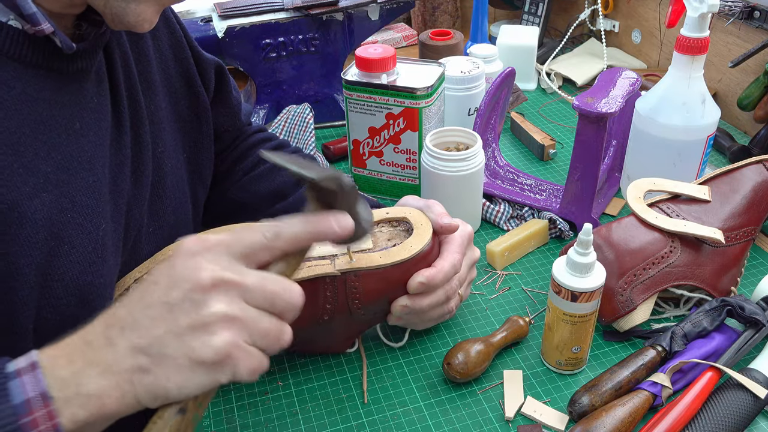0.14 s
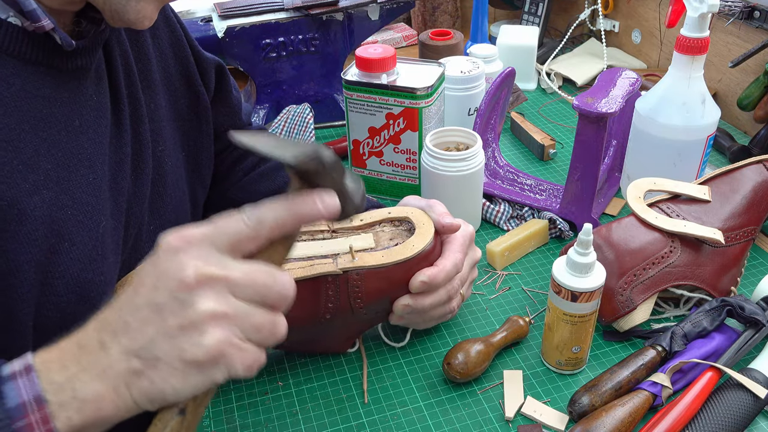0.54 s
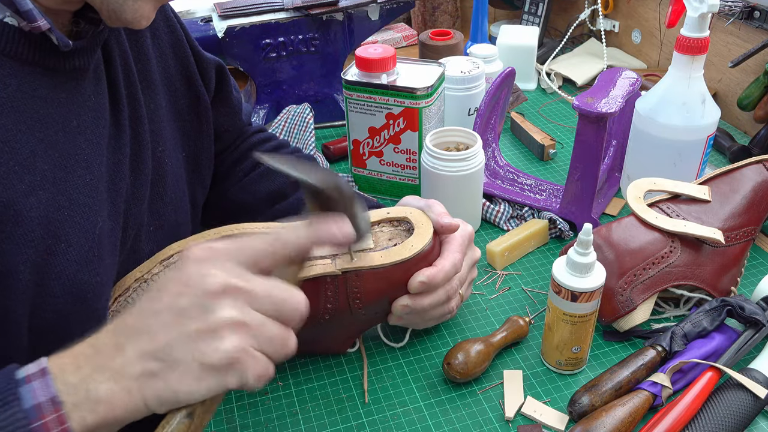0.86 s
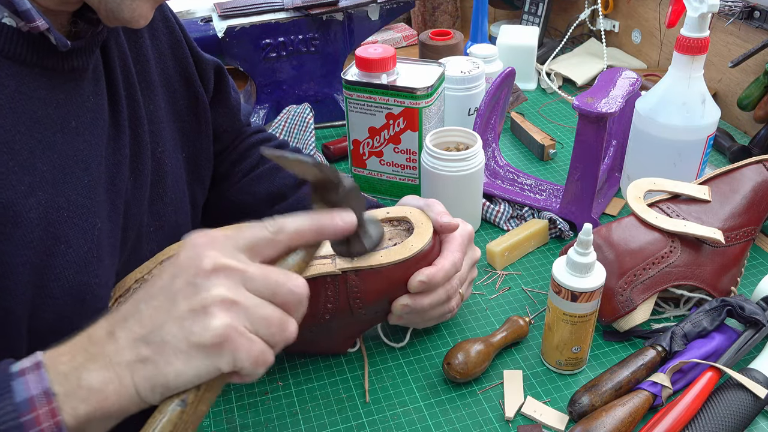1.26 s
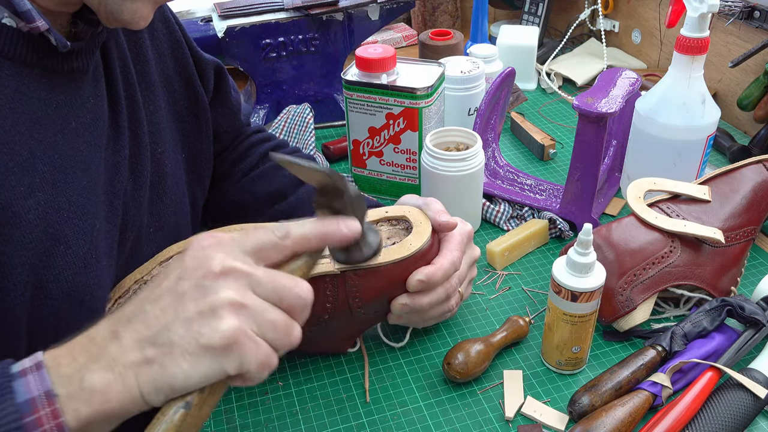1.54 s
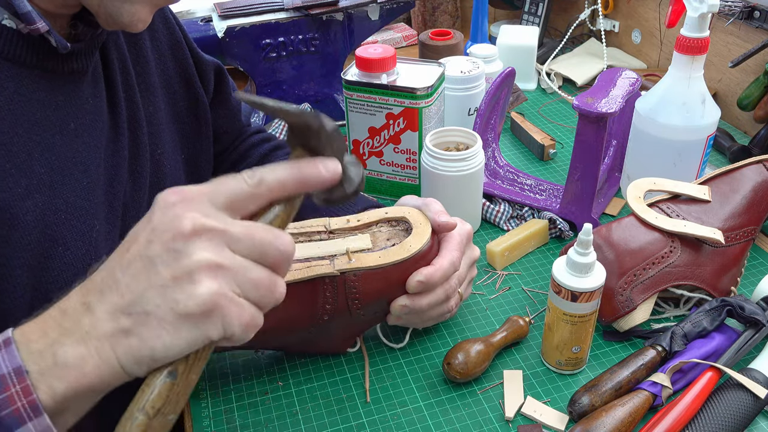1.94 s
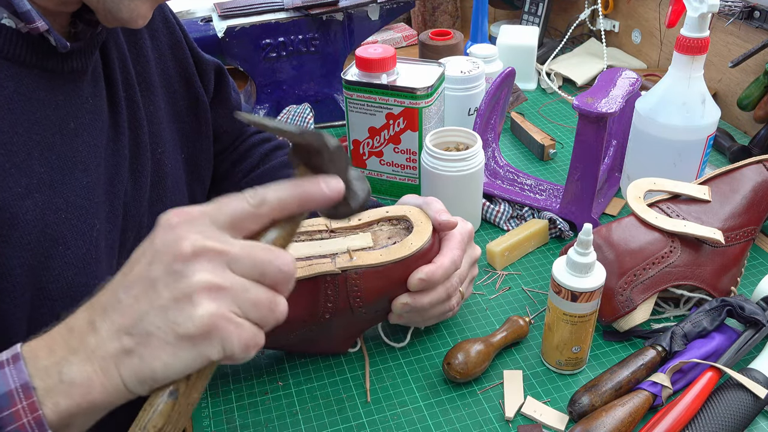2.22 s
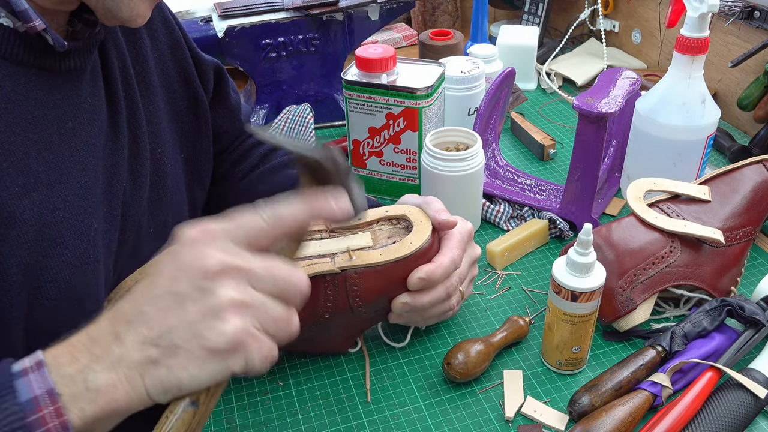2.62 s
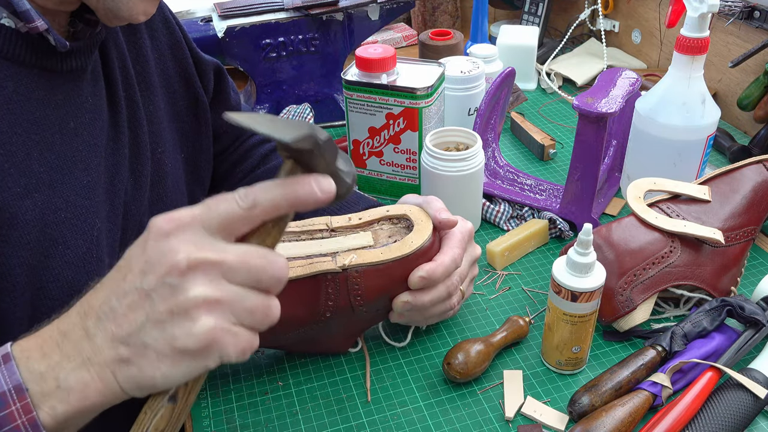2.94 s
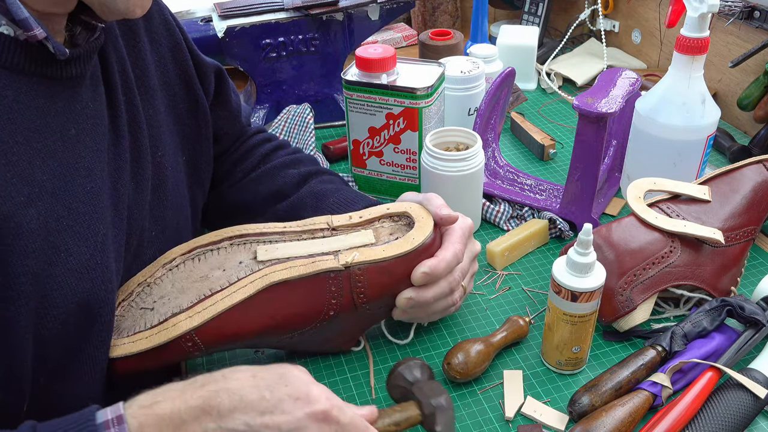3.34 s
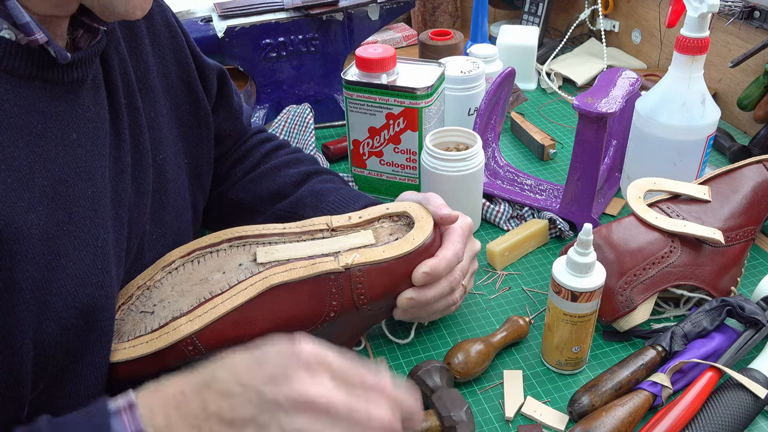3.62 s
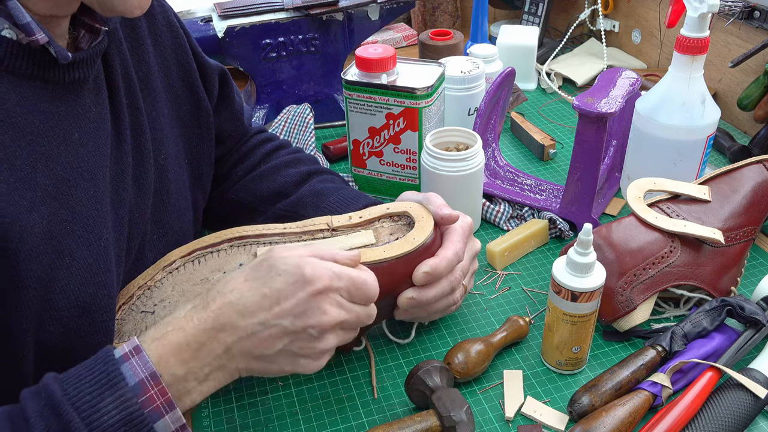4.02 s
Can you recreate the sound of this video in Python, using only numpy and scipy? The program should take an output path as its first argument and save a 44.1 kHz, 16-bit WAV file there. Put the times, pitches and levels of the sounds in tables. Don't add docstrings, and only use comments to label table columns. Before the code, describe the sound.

Ten even, blunt hammer blows on leather and wood, loud enough to distort a close microphone, each with a sharp click, dull knock, faint steel ring and bench boom. The room is small and dry. After the last blow come light ticks and cloth movement, then softer hollow wooden thuds and a clatter as the hammer is set down and rocks to rest. Faint finger rubbing closes over low room rumble.

```python
import sys
import numpy as np
from scipy import signal
from scipy.fft import rfft, irfft
from scipy.io import wavfile
from scipy.ndimage import uniform_filter1d

SR = 44100
rng = np.random.default_rng(int(sys.argv[2]) if len(sys.argv) > 2 else 0)


def gain_from_db(level_db):
    decades = np.asarray(level_db, float) / 20
    return 10 ** decades


def transcribe(signal):
    frames = np.atleast_2d(signal).T
    limited = np.clip(frames, -1, 1)
    pcm = np.round(limited * 32767).astype(np.int16)
    wavfile.write(sys.argv[1], SR, pcm)


N = 183730
LEAD = SR // 4

# f/Hz, level/dB
KNOCK_REFLECTIONS = [(100, 2.5), (350, -6), (700, 0.5), (1500, -1), (4000, -2), (8000, -8.5), (15000, 9.5)]
# f/Hz, level/dB, t60/s
TOOLS = [(1421, -33, .06), (2837, -24, .045), (4100, -31, .05), (5146, -41, .07), (6907, -45, .12),
         (7908, -45, .06), (8818, -42, .12), (10040, -40, .09)]
# f/Hz, level/dB, t60/s
HANDLE = [(445, -21, 0.063), (501, -22.5, 0.11), (606, -16, 0.045), (790, -16.5, 0.025),
          (954, -15.5, 0.026), (1433, -17.5, 0.023)]
# f/Hz, level/dB, t60/s
AWL = [(3360, 0, .13)]
# f/Hz, level/dB, t60/s
CLAW = [(8100, 0, .09)]
# f/Hz, level/dB, t60/s
POLL = [(6907, 0, .3)]


def read(points, hz):
    f, value = np.transpose(points)
    return np.interp(np.log(hz + 1), np.log(f + 1), value)


def evened(x):
    return x / np.sqrt(np.mean(x ** 2) + 1e-20)


def add(mix, s, sound):
    part = mix[LEAD + round(s * SR):][:len(sound)]
    part += sound[:len(part)]


def ring(modes, seconds, rise_s=.0001):
    t = np.arange(round(seconds * SR)) / SR
    hz, db, t60 = np.transpose(modes)[:, :, None]
    decaying = gain_from_db(db - 60 * t / t60) * np.sin(2 * np.pi * hz * t)
    return decaying.sum(0) * (1 - np.exp(-t / rise_s))


def shifted(modes, spread, spread_db):
    spot = rng.standard_normal((len(modes), 2))
    return [(hz * (1 + spread * a), db + spread_db * b, t60)
            for (hz, db, t60), (a, b) in zip(modes, spot)]


def coloured(points, size):
    hz = np.fft.rfftfreq(size, 1 / SR)
    spectrum = rfft(rng.standard_normal(size)) * gain_from_db(read(points, hz))
    return evened(irfft(spectrum, size))


def room_tail(tone, gap_s=0.00033, build_s=0.0099):
    # f/Hz, t60/s
    decay_times = [(100, 0.32), (400, 0.19), (1100, 0.16), (3000, 0.1623), (8000, .17), (15000, 0.11)]
    size = SR // 2
    hz, t, z = signal.stft(coloured(tone, size), SR, nperseg=256)
    decay = gain_from_db(-60 * t / read(decay_times, hz)[:, None])
    tail = signal.istft(z * decay, SR, nperseg=256)[1][:size]
    t = np.arange(size) / SR
    tail = tail * (1 - np.exp(-np.maximum(t - gap_s, 0) / build_s))
    tail = tail * gain_from_db(2.5 * evened(uniform_filter1d(rng.standard_normal(size), size=90)))
    return tail / np.linalg.norm(tail)


def air():
    # f/Hz, level/dB
    air_spectrum = [(12, -21.5), (28, 0), (45, 3), (80, -15), (160, -18.5), (400, -29), (1000, -34.5),
                    (2800, -42), (3900, -40), (5500, -47), (15000, -50), (16500, -56)]
    return gain_from_db(-53.5) * coloured(air_spectrum, N)


def swish():
    swing = np.arange(round(0.045 * SR)) / (0.055 * SR)
    return gain_from_db(-75.5) * swing * coloured([(200, -10.0), (800, -3.5), (2500, 9), (5000, -17)], len(swing))


def blows(tail_db=13, sway_share=0.6):
    # t/s, force level/dB, low head mode level/dB, high head mode level/dB, sharp edge level/dB
    strikes = [(-.19, -20, -76.5, -70, 0), (0.0875, -4, -58, -66.5, 8.5), (0.3658, -5.5, -66, -40, 3.5),
               (0.649, -2.5, -49, -54, 7.5), (0.9286, -3, -61, -57.5, 8.5), (1.2196, -3.5, -68, -50, 8),
               (1.5163, 0, -60.5, -66.5, 5), (1.8092, -1, -49, -72, 3.5), (2.1023, -1.5, -52, -75, 7),
               (2.3966, -2, -52, -64, 6), (2.7023, -1, -45.5, -74.5, -2)]
    # f/Hz, level/dB, t60/s
    face_modes = [(1966, 2, .0065), (3870, -3, .007), (5024, -6, 0.0081)]
    # f/Hz, level/dB, t60/s
    edge_modes = [(8600, -19.5, 0.0036), (13300, -22.5, 0.004)]
    # f/Hz, level/dB, t60/s
    shoe_modes = [(373, -0.5, .028), (528, 7, .011), (1064, 7, 0.0083), (1367, 1, .008)]
    # f/Hz, level/dB, t60/s
    bench_modes = [(91.2, -8.5, .19), (140.3, -8.5, .1), (158.4, -43, 0.8), (151, -47.5, .8),
                   (260.4, -16, .1), (315.6, -10.5, 0.081), (369.6, -9, 0.076), (438.3, -17.5, 0.094),
                   (565, -20, .13), (607, -22, .14), (643, -21, .12), (686, -22, .1), (765, -23, .11),
                  (876, -24, .11), (943, -23, .1), (1036, -24, .1), (1100, -23, .1)]
    # f/Hz, level/dB, t60/s
    leg_modes = [(27.73, -24.5, 0.55), (37.67, -25, 0.99), (46.5, -38.5, 0.35), (64.31, -41.5, 2.6)]
    # f/Hz, t60/s
    head_modes = [(6907, .45), (10790, .15)]
    # f/Hz, level/dB
    blow_reflections = [(130, -27), (240, -1), (340, -3.5), (600, -1), (1000, -2), (1600, -10), (2200, -12),
                        (2900, -16.5), (3900, -13), (5500, -23), (7000, -32), (11000, -34), (15500, -38.5)]
    shoe_lag_s, bench_lag_s, legs_lag_s = .0011, .0048, .003
    same = .7

    out = np.zeros(N + LEAD)
    walls = room_tail(blow_reflections)
    legs = ring(leg_modes, 1.5, rise_s=0.0039)
    for s, force_db, low_db, high_db, edge_db in strikes:
        force = gain_from_db(force_db)
        push_db = 0.75
        if s == strikes[-1][0]:
            push_db -= 7
        add(out, s, -force * ring(shifted(face_modes, .035, 1.6), .02))
        add(out, s, -gain_from_db(edge_db) * ring(shifted(edge_modes, .04, 1.3), .01))
        add(out, s + shoe_lag_s, force * ring(shifted(shoe_modes, .04, 1.8), .05))
        shaken = shifted(bench_modes, .012, 1.1)
        add(out, s + bench_lag_s, gain_from_db(push_db) * ring(shaken, .8, rise_s=.002))
        add(out, s + legs_lag_s, gain_from_db(sway_share * push_db) * legs)
        head = [(hz, db, t60) for (hz, t60), db in zip(head_modes, (low_db, high_db))]
        add(out, s, ring(head, .4))
        reflections = same * walls + np.sqrt(1 - same ** 2) * room_tail(blow_reflections)
        add(out, s, gain_from_db(force_db + tail_db) * reflections)
        if s > 0:
            add(out, s - .05, swish())
    return out


def chatter(sound, count=5):
    at, size = rng.random((2, count))
    taps = np.zeros(round(.012 * SR))
    places = np.round(.004 * SR * at ** 1.5)
    taps[np.minimum(places, len(taps) - 1).astype(int)] = gain_from_db(-8) * (2 * size - 1)
    taps[0] = 1
    out = np.convolve(sound, taps)
    return out * np.linalg.norm(sound) / np.linalg.norm(out)


def knocks(wet_db=-3):
    # t/s, tick level/dB, brightness/(dB per octave)
    light_touches = [(1.678, -52, -1.5), (1.752, -55.5, 0.5), (2.871, -67, -0.5), (2.9952, -47.5, 13),
                     (3.1053, -49.5, 0), (3.1863, -42.5, -2.5), (3.1945, -41, 7), (3.207, -50, 7),
                     (3.2950, -34, 9), (3.3216, -45, 7.5), (3.479, -48, 10.5), (3.926, -49, -4),
                     (4.002, -61.5, 1), (4.065, -55.5, 0)]
    # t/s, tick level/dB, thud level/dB, thud f/Hz, brightness/(dB per octave)
    hammer_knocks = [(3.2127, -56.5, -28, 248, 1.5), (3.2270, -39.5, -55, 300, 14),
                     (3.3772, -15, 6.5, 296.4, -4.5), (3.4229, -26.5, -3, 277, -7),
                     (3.4440, -26.5, -19, 223, 6.5), (3.5322, -7, -0.5, 226.6, -1),
                     (3.5780, -13, -5.5, 300, 4), (3.6350, -24.5, -9, 300, 0), (3.6579, -33, -20, 367, 2)]
    # multiple of the thud pitch/1, level/dB, t60/s
    thud_partials = [(1, 0, .02), (1.5, -12, .03), (2.3, -17, .015), (3.9, -26, .04)]
    # f/Hz, level/dB, t60/s
    tick_modes = [(1490, -13.5, 0.013), (2670, 9, 0.0016), (3836, -1, 0.005), (6970, -6.5, 0.002),
                  (11800, -24, .002)]
    # t/s, level/dB
    wall_echoes = [(.0116, -7), (.019, -12), (.031, -17)]
    # f/Hz, level/dB, t60/s
    underside_modes = [(95, -9.5, 0.13), (147, -2, 0.035), (291, -34, 0.073), (407, -10, 0.084)]

    out = np.zeros(N + LEAD)
    bench = ring(underside_modes, .3, rise_s=0.0016)
    touches = [(s, db, db - 19, 300, tilt_db) for s, db, tilt_db in light_touches]
    for s, tick_db, thud_db, thud_hz, tilt_db in sorted(hammer_knocks + touches):
        partials = [(k * thud_hz, db, t60) for k, db, t60 in thud_partials]
        thud = gain_from_db(thud_db) * ring(partials, .05, rise_s=.002)
        tick = [(hz, db + tilt_db * np.log2(hz / 3500), t60)
                for hz, db, t60 in shifted(tick_modes, .08, 3)]
        skid = gain_from_db(tick_db) * chatter(ring(tick, .05))
        hit = -np.pad(thud, (0, round(.012 * SR) - 1)) - skid
        add(out, s, hit)
        for lag_s, db in wall_echoes:
            add(out, s + lag_s, -gain_from_db(db) * thud)
        add(out, s, gain_from_db(wet_db) * signal.fftconvolve(hit, room_tail(KNOCK_REFLECTIONS)))
        add(out, s + 0.00075, gain_from_db(-15 + 0.85 * thud_db) * bench)
    return out


def pressure():
    # start t/s, length t/s, level/dB, fade/dB
    strokes = [(3.085, 0.094, -63.5, -15), (3.15, .05, -67, -2), (3.207, 0.18, -45, -13.5),
               (3.406, 0.24, -57, -7), (3.552, 0.373, -54.5, -11.5), (3.91, 0.1106, -60.5, -8)]
    rise_s, end_s = 0.021, 0.025
    t = np.arange(N) / SR
    total = np.zeros(N)
    for s, length, db, fade_db in strokes:
        press = np.clip((t - s) / rise_s, 0, 1) ** 2
        lift = np.clip((s + length - t) / end_s, 0, 1)
        total += press * lift * gain_from_db(db + fade_db * np.clip((t - s) / length, 0, 1))
    return total


def rub(grains_per_s=5000, spread_db=2.4):
    # f/Hz, bandwidth/Hz, level/dB
    rub_resonances = [(270, 70, 0), (600, 300, -12), (1000, 500, -11), (2260, 260, -13), (3700, 800, -22),
                      (7000, 5000, -38)]
    strength = gain_from_db(spread_db * np.minimum(rng.exponential(1, N), 4))
    slips = rng.random(N) < grains_per_s / SR
    grains = strength * slips * rng.standard_normal(N)
    hz = np.fft.rfftfreq(N, 1 / SR)
    body = np.sqrt(sum(gain_from_db(2 * db) / (1 + (2 * (hz - f) / bandwidth) ** 2) ** 2
                       for f, bandwidth, db in rub_resonances))
    return pressure() * evened(irfft(rfft(grains) * body, N))


def rustles():
    # start t/s, length t/s, level/dB
    sleeve_moves = [(3.092, 0.049, -61.5), (3.174, 0.069, -58), (3.92, 0.023, -64.5)]
    # f/Hz, level/dB
    cloth_spectrum = [(1000, -20), (2500, -9.5), (4000, 8), (6000, 0), (11000, -4), (16000, -18)]
    out = np.zeros(N + LEAD)
    for s, length, db in sleeve_moves:
        noise = coloured(cloth_spectrum, SR // 5)[:round(length * SR)]
        add(out, s, gain_from_db(db) * noise * np.hanning(len(noise)))
    return out


def clinks():
    # (t/s, level/dB)
    ringing_objects = [(TOOLS, [(3.5325, 1.5)]), (HANDLE, [(3.5795, 7), (3.636, -19)]),
                       (AWL, [(3.636, -41.5)]), (CLAW, [(3.245, -62), (3.379, -62)]), (POLL, [(3.296, -67),
                       (3.578, -59)])]
    held_s = 0.057
    out = np.zeros(N + LEAD)
    for modes, strikes in ringing_objects:
        rise_s = .0025 if modes is HANDLE else .0001
        for s, db in strikes:
            clink = gain_from_db(db) * ring(modes, .25, rise_s=rise_s)
            if modes is TOOLS:
                clink = clink * gain_from_db(-900 * np.maximum(np.arange(len(clink)) / SR - held_s, 0))
            add(out, s, clink)
            add(out, s, gain_from_db(-5.0) * signal.fftconvolve(clink, room_tail(KNOCK_REFLECTIONS)))
    return out


def scene():
    hits = blows() + knocks() + rustles() + clinks()
    return (hits[LEAD:] + rub() + air())[None]


def roll_off(x):
    return signal.sosfilt(signal.butter(12, 16540, fs=SR, output="sos"), x)


def record(dry):
    clipped = np.clip(dry, -.93, .93)
    tilted = signal.lfilter(*signal.butter(1, 18, "high", fs=SR), clipped)
    limited = signal.oaconvolve(tilted, signal.firwin(255, 15950, fs=SR)[None], "same")
    finished = np.clip(limited, -1, 1)
    return roll_off(finished)


dry = scene()
out = record(dry)
transcribe(out)
```